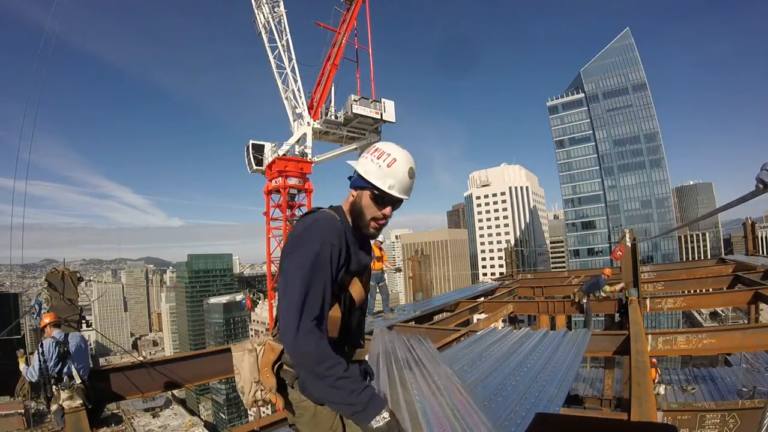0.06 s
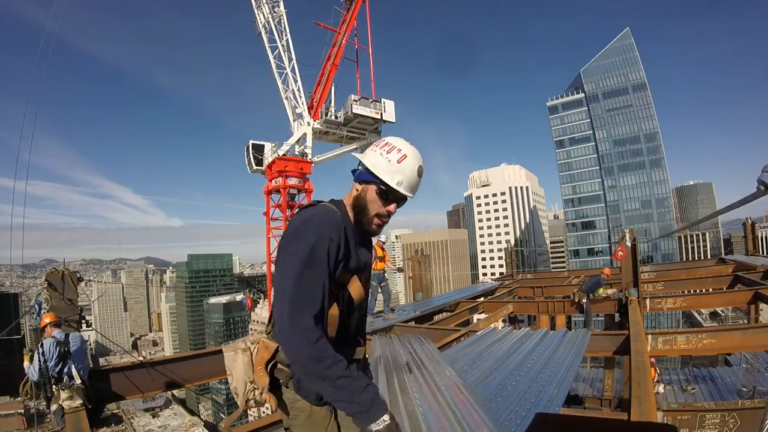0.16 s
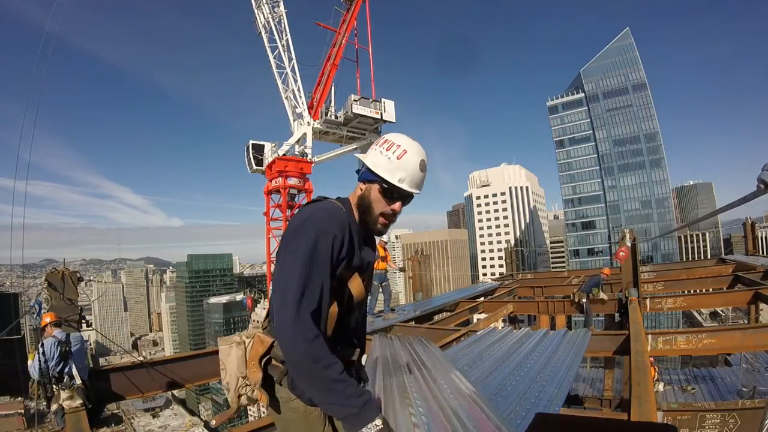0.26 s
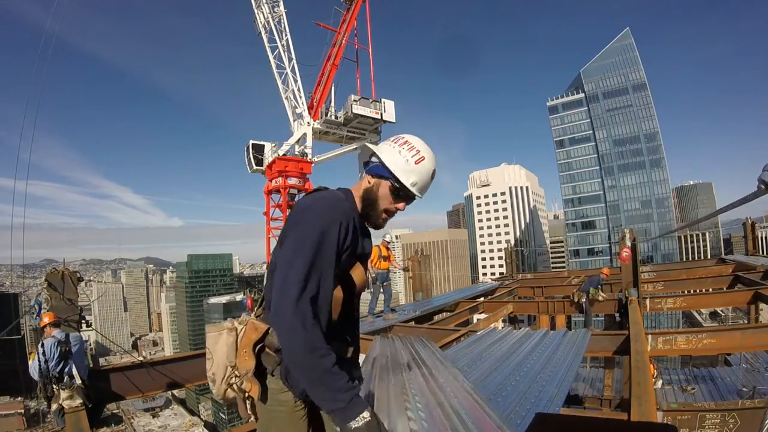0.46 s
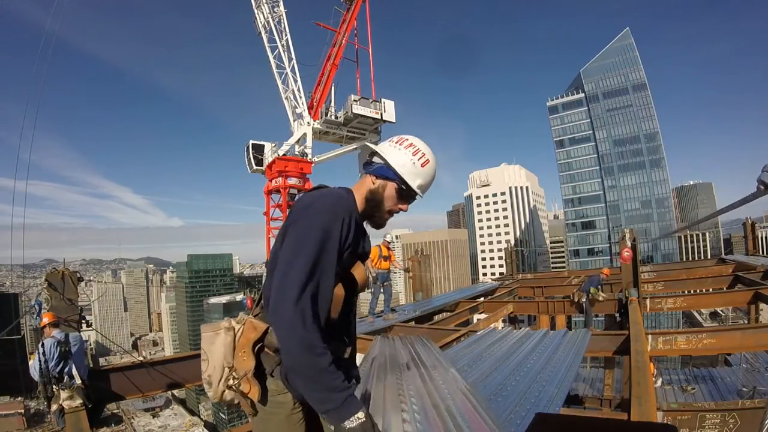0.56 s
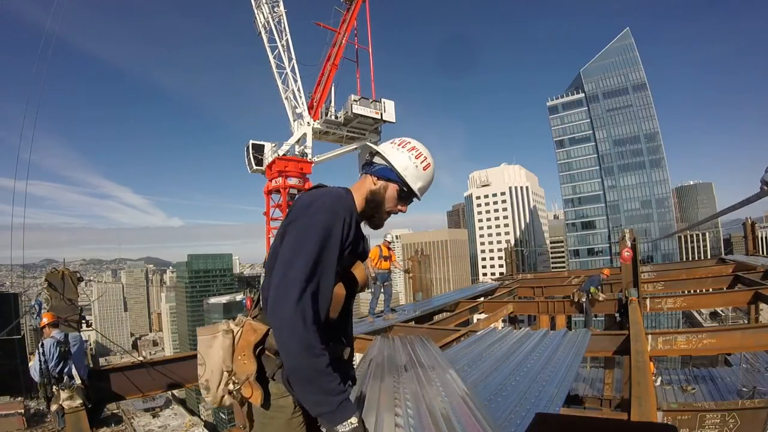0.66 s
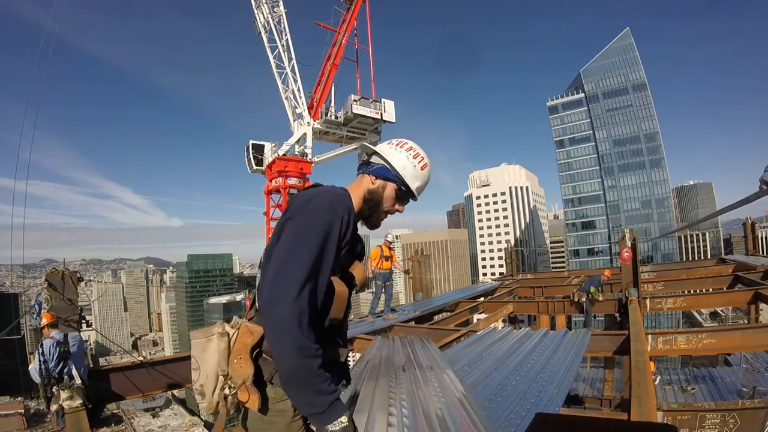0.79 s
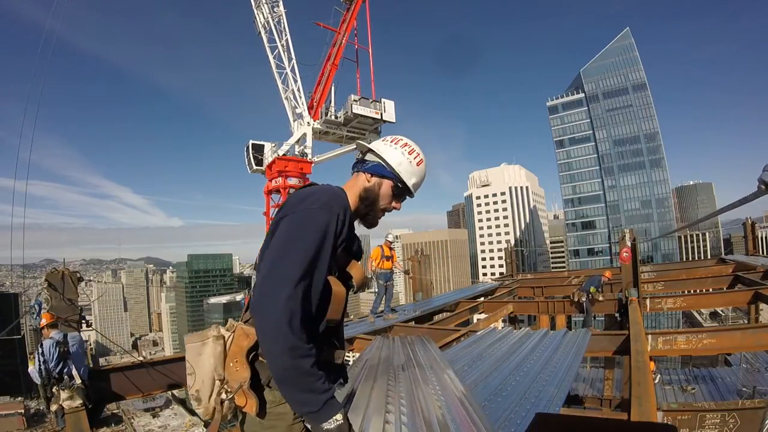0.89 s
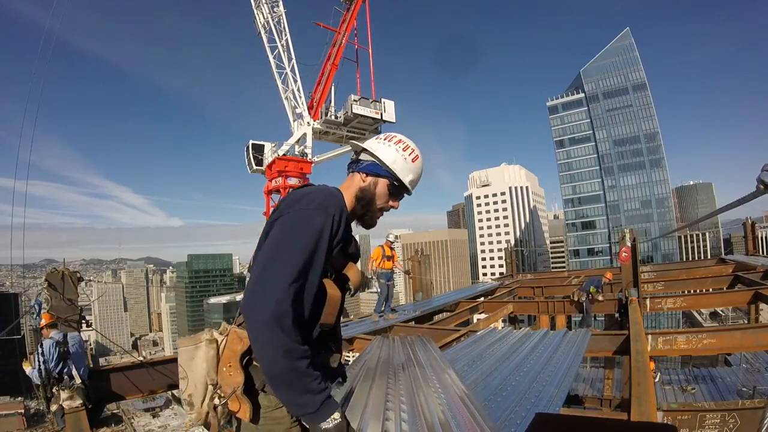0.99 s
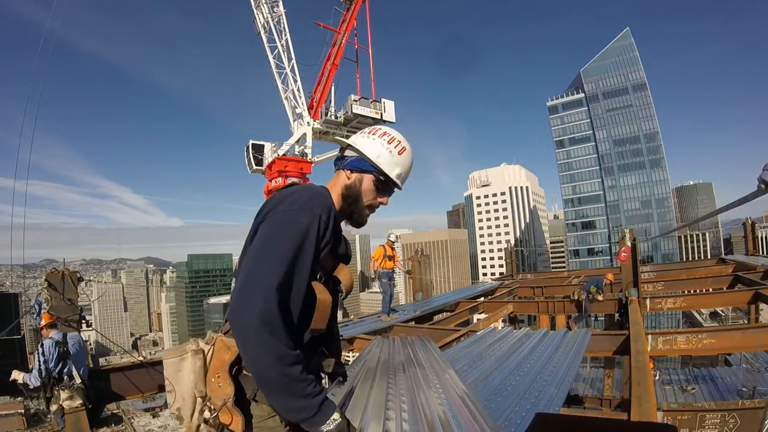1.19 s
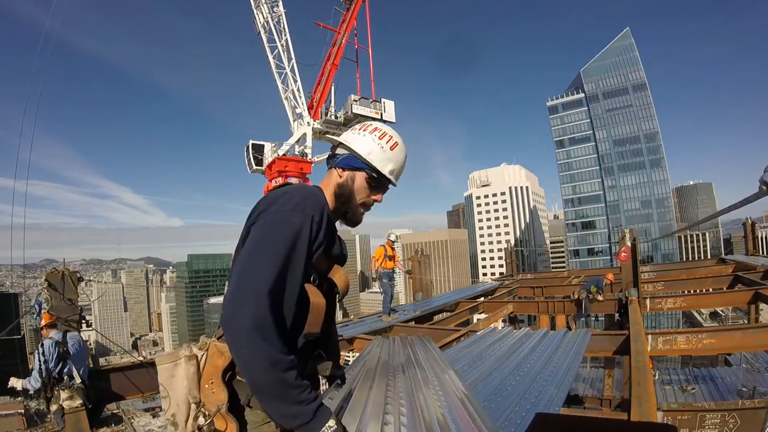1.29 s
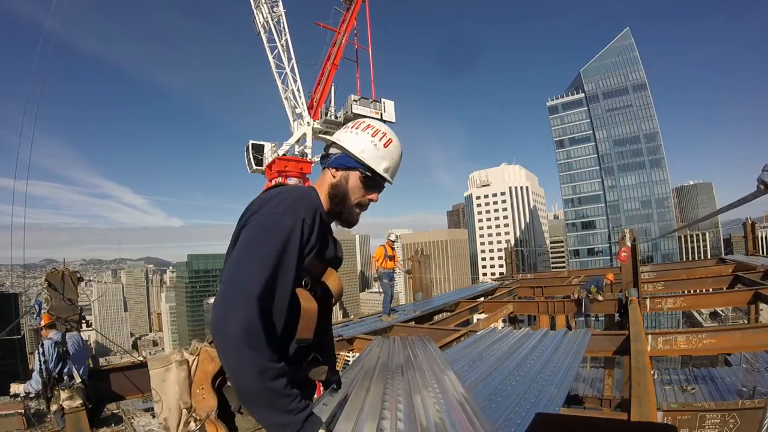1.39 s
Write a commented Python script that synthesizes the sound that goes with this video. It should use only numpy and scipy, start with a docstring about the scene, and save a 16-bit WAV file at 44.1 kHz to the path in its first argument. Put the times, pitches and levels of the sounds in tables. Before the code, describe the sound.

A corrugated steel sheet squeaks, bangs down on a stack, then scrapes and rattles to rest.

```python
"""Corrugated steel sheet landing on a stack.

Outdoors on a high steel frame, a long sheet squeaks by stick-slip as it starts to move, then bangs
down on a stack of decking. Impacts and sliding friction excite its dense modes, so it clashes several
times, then scrapes and rattles to rest. The whole sheet bends with a deep boom, its ribs drum and its
dragging edge groans; wind and the city rumble faintly below."""
import sys
import numpy as np
from scipy import signal
from scipy.fft import rfft, irfft, next_fast_len
from scipy.io import wavfile
from scipy.ndimage import uniform_filter1d, map_coordinates

SR = 44100
rng = np.random.default_rng(int(sys.argv[2]) if len(sys.argv) > 2 else 0)


def store_pcm(level_fs):
    """Save levels as 16-bit WAV."""
    pcm = np.round(np.clip(level_fs, -1, 1) * 32767).astype(np.int16)
    wavfile.write(sys.argv[1], SR, np.atleast_2d(pcm).T)


N = 63945
TIME = np.arange(N) / SR


# Spectra of the dense clang and the bright clash. Each row: frequency in Hz, relative density in dB.
CLANG_SPECTRUM = [(150, -36.5), (450, -23.5), (770, -24.5), (1080, -23), (1230, -15.5), (1380, -2),
                  (1580, 4), (1720, -5.5), (1840, -12.5), (2040, -4), (2330, -5.5), (2660, -8.5),
                  (2870, -18.5), (3150, -20), (3500, -25.5), (4100, -26.5), (5000, -38), (9000, -61.5),
                  (13000, -96.5)]
CLASH_SPECTRUM = [(1500, -30), (3000, -1.5), (4100, -0.5), (5200, -8), (6000, -1.5), (6600, 3),
                  (7500, -7.5), (8250, -4.5), (8800, -14.5), (10000, -25), (11500, -33.5), (13200, -48.5),
                  (15000, -71)]
# Blows on the stack. Each row: start in seconds, clang in dB, clash in dB, contact time in seconds.
IMPACTS = [(0.205, -16.5, -30.5, 0.011), (0.218, -21, -41.5, .016), (.23, -22, -45, 0.0082),
           (0.263, -25, -35.5, .025), (0.288, -17.5, -38, .018), (0.318, -19, -38, 0.019),
           (0.343, -20.5, -57, 0.012), (0.375, -24, -38.5, 0.0099), (0.389, -14.5, -36.5, 0.0042),
           (0.4, -18, -36, 0.013), (0.444, -21.5, -47, 0.0095), (0.468, -19.5, -36.5, 0.023),
           (.486, -22.5, -43, 0.0157), (0.496, -23, -47, 0.013), (0.532, -19.5, -43, 0.016),
           (0.619, -27, -52, 0.023), (0.646, -28.5, -49.5, 0.0076), (0.696, -27.5, -49.5, 0.0305),
           (0.762, -31, -58, 0.008), (0.809, -29.5, -52.5, 0.012), (0.908, -39, -59, 0.0055),
           (0.981, -40, -56.5, 0.005), (1.204, -40.5, -62.5, 0.0049), (1.261, -46.5, -75, .012)]

def blows():
    """Impact excitation: rib after rib lands in a short burst, giving a clang with a bright clash on top."""
    out = np.zeros(N)
    for start, clang_db, clash_db, length in IMPACTS:
        ring = ringing(grains() * swell(start - .002, length))
        clang = amp(clang_db) * peak_unit(coloured(ring, CLANG_SPECTRUM))
        clash = amp(clash_db) * peak_unit(coloured(ring, CLASH_SPECTRUM))
        out += clang + clash
    return out


# Ringing under the skid's pressure, and its scraping hiss. Each row: time in seconds, level in dB.
SKID_LEVEL = [(0, -52), (.11, -47), (.15, -38), (.2, -29.5), (.26, -18.5), (.36, -26.5), (.43, -24),
              (.56, -21), (.68, -26), (.85, -32), (1.0, -37.5), (1.12, -42), (1.26, -42.5), (1.35, -49),
              (1.45, -50.5)]
HISS_LEVEL = [(0, -67.5), (.13, -67.5), (.172, -51), (.198, -58), (.25, -43.5), (.36, -46.5), (.43, -47.5),
              (.54, -44), (.6, -51.5), (.76, -54), (.95, -70), (1.15, -66), (1.45, -86.5)]

def skid():
    """Frictional excitation: juddering contact keeps the sheet ringing and adds a gritty hiss."""
    skid_db, = curves(SKID_LEVEL)
    hiss_db, = curves(HISS_LEVEL)
    judder = amp(0.35 * wobble(89.1))
    body = steady(coloured(ringing(grains()), CLANG_SPECTRUM), size=1500)
    hiss = unit(coloured(grains(), CLASH_SPECTRUM))
    return judder * (amp(skid_db) * body + amp(hiss_db) * hiss)


def grains(per_second=4000):
    """Shot noise: tiny steel-on-steel contacts arrive at random, with random sign and size."""
    hit = rng.random(N) < per_second / SR
    sign = rng.choice([-1, 1], N)
    size_db = 7 * rng.uniform(-1.37, 1, N)
    return unit(hit * sign * amp(size_db))


# Damping of the sheet. Each row: frequency in Hz, time to decay by 60 dB in seconds.
DECAY_TIMES = [(200, 0.46), (1500, 0.22), (2500, 0.2), (4000, 0.17), (7000, 0.16), (12000, 0.076)]

def ringing(force):
    """Modal damping: countless modes decay, the high ones first; each contact point rings differently."""
    hz, t, spectra = signal.stft(rng.standard_normal(SR // 2), SR, nperseg=256)
    decay = amp(-60 * t / along(DECAY_TIMES, hz)[:, None])
    _, impulse_response = signal.istft(spectra * decay, SR, nperseg=256)
    return signal.fftconvolve(force, impulse_response)[:N]


# Lasting modes. Each row: frequency in Hz, relative level in dB, time to decay by 60 dB in seconds.
LONG_MODES = [(799, -18, 1.5), (918.7, -8.5, 1), (1280, -6.5, 1), (1388, 1, 1.3), (1512, -9.5, .5),
              (1566, -0.5, 1), (1780, -20.5, .6), (1754, -2, 0.69), (2025.4, -1.5, 0.38), (2215, -16.5, .7),
              (2312, -5.5, 1.3), (2370, -14.5, .9), (2350, -26, 0.47), (2735, -12.5, 0.38), (3110, -11, .8)]

def long_modes(clatter, gain_db=-13.5):
    """Resonance: a few lightly damped modes store the clatter's energy and sing on."""
    power = np.abs(uniform_filter1d(clatter ** 2, size=400))
    out = np.zeros(N)
    for hz, db, t60 in LONG_MODES:
        decay = amp(-120 * TIME / t60)  # energy goes as amplitude squared
        energy = np.abs(signal.fftconvolve(power, decay / decay.sum())[:N])
        envelope = amp(db + 1.9 * wobble(12.9)) * np.sqrt(energy)
        out += envelope * np.sin(2 * np.pi * hz * TIME + 1.42 * wobble(21.78))
    return amp(gain_db) * out


# Slow rise and fall of the hollow wash. Each row: time in seconds, level in dB.
WASH_LEVEL = [(0, -59.5), (.05, -64), (.1, -54.5), (.2, -43.5), (.29, -31), (.42, -31.5), (.62, -32.5),
              (.78, -34.5), (.9, -37.5), (1.02, -40.5), (1.1, -45), (1.2, -45), (1.3, -51), (1.45, -55.5)]
# Its spectrum. Each row: frequency in Hz, relative density in dB.
WASH_SPECTRUM = [(200, -18.5), (380, 2), (480, 1), (590, -6.5), (690, -1.5), (790, -0.5), (850, -3.5),
                 (920, 0.5), (1080, -9.5), (1250, 0.5), (1600, -14), (3000, -69), (6000, -96.5)]

def wash():
    """Modal overlap: the sheet's crowded lower modes merge into a hollow roar under the clatter."""
    db, = curves(WASH_LEVEL)
    return amp(db) * steady(coloured(grains(), WASH_SPECTRUM), size=2000)


# Flexing of the whole sheet. Each row: time in seconds, frequency in Hz, level in dB.
BENDING_MODE = [(0, 61.5, -35), (.06, 63.94, -48.5), (.15, 66.2, -31), (.215, 62.3, -43), (.27, 62, -24.5),
                (.304, 63.1, -18), (.345, 62.5, -28), (.388, 60.5, -40.5), (.408, 65.8, -11.5),
                (.5, 68.7, -12), (.58, 65.34, -18), (.626, 63.2, -30), (.655, 65, -18), (.76, 69.1, -21.5),
                (.79, 73, -29.5), (.905, 73, -28), (.98, 69.5, -38), (1.08, 65.26, -26.5), (1.3, 65.5, -31),
                (1.36, 66.3, -40), (1.43, 65.2, -26.5)]
# Rumble of the neighbouring modes. Each row: frequency in Hz, relative density in dB.
RUMBLE_SPECTRUM = [(20, -15.5), (40, -11.5), (58, -1), (84, -3), (102, -11), (200, -23.5), (600, -75),
                   (4000, -125)]

def boom(rumble_offset_db=-9):
    """Flexural vibration: the lowest bending mode booms, and a rumble loosely follows its level."""
    hz, db = curves(BENDING_MODE)
    shudder_db = 0.8 * wobble(25)
    tone = np.sqrt(2) * amp(db + shudder_db) * np.sin(phase(hz))
    rumble = steady(noise(RUMBLE_SPECTRUM), size=5000)
    trend_db = db.mean() + 0.87 * (uniform_filter1d(db, size=7000) - db.mean())
    return tone + amp(trend_db + rumble_offset_db) * rumble


# Modes of the ribs and of the flats between them. Each row: frequency in Hz, relative level in dB.
RIB_MODES = [(128, 1), (153, 1.5), (174, -0.5)]
FLAT_MODES = [(203, -4.5), (242, 0.5), (263, -3), (283, -9), (305, -4.5), (338, -2.5), (378, -10)]
# Drumming of the sheet. Each row: time in seconds, level of the ribs in dB, level of the flats in dB.
DRUM_LEVELS = [(0, -58, -36.5), (.04, -51, -58), (.07, -33, -38.5), (.12, -44, -37), (.17, -47, -32.5),
               (.22, -45, -30.5), (.3, -35, -28), (.45, -22.5, -28.5), (.7, -37, -35), (.95, -28.5, -35.5),
               (1.1, -36.5, -35), (1.25, -31.5, -37.5), (1.45, -41.5, -43.5)]

def drumming():
    """Forced vibration: ribs and flats drum as they ride over the stack."""
    ribs_db, flats_db = curves(DRUM_LEVELS)
    ribs = amp(ribs_db) * rubbed(RIB_MODES, rate=20, smear=1.0)
    flats = amp(flats_db) * rubbed(FLAT_MODES, rate=30, smear=0.99)
    return ribs + flats


def rubbed(modes, rate, smear):
    """Random modulation: under uneven rubbing each mode wanders in level and phase."""
    out = np.zeros(N)
    for hz, db in modes:
        envelope = amp(db + 5 * wobble(rate))
        angle = 2 * np.pi * (hz * TIME + rng.random())
        out += envelope * np.sin(angle + smear * wobble(rate))
    return unit(out)


# Popping ribs. Each row: start in seconds, frequency in Hz, level in dB, length in seconds.
RIB_POPS = [(.238, 152.7, -21.5, 0.046), (.275, 154.5, -17.5, .05), (.33, 154.4, -23.5, 0.045),
            (.365, 153.4, -21.5, 0.033), (.41, 157, -25, 0.044), (.59, 158, -21, .04),
            (.645, 169.4, -23, .06), (.76, 154, -18, 0.028), (.812, 143, -21, 0.02)]

def rib_pops():
    """Snap-through: a rib pops and gives a few cycles of a low tone."""
    out = np.zeros(N)
    for start, hz, db, length in RIB_POPS:
        out += amp(db) * swell(start, length) * np.sin(2 * np.pi * hz * (TIME - start))
    return np.sqrt(2) * out


# Groan of the edge. Each row: time in seconds, frequency in Hz, level in dB.
EDGE_GROAN = [(0, 330, -72), (.09, 325, -45), (.15, 350, -35), (.22, 350, -35.5), (.3, 348, -41.5),
              (.37, 340, -32), (.5, 338, -34), (.66, 338, -33), (.73, 340, -41), (.82, 342, -35.5),
              (.93, 340, -47), (1.15, 335, -46.5), (1.25, 343, -37.5), (1.36, 343, -41.5),
              (1.45, 345, -48.5)]

def groan(waver=0.34):
    """Friction-driven oscillation: the dragging edge sustains one low mode of the flats."""
    hz, db = curves(EDGE_GROAN)
    envelope = np.sqrt(2) * amp(db + 0.82 * wobble(25))
    return envelope * np.sin(phase(hz) + waver * wobble(30))


# Squeaks. Each row: start and length in seconds, first and last frequency in Hz, level in dB.
EDGE_SQUEAKS = [(0.059, 0.017, 1452, 1480, -34.5), (0.072, 0.034, 1455, 1386, -36.5),
                (0.118, 0.036, 709, 682, -36), (.128, .018, 1490, 1460, -36.5),
                (0.139, 0.0144, 2260, 2160, -31.5), (0.15, 0.02, 1510, 1460, -30),
                (0.154, 0.016, 2140, 2350, -31.5), (.169, .018, 2260, 2170, -27.5),
                (.17, 0.011, 1540, 1415, -26), (.184, 0.011, 1500, 1499, -29),
                (0.186, 0.023, 679, 716, -39.5), (0.208, .032, 1578, 1687, -14.5)]

def squeaks(roughness=.35):
    """Stick-slip: the edge catches and releases, giving short gliding tones."""
    out = np.zeros(N)
    for start, length, first_hz, last_hz, db in EDGE_SQUEAKS:
        hz = np.interp(TIME, [start, start + length], [first_hz, last_hz])
        out += amp(db) * swell(start, length) * np.sin(phase(hz) + roughness * wobble(404.6))
    return np.sqrt(2) * out


# Outdoor background. Each row: frequency in Hz, relative density in dB.
AIR_SPECTRUM = [(20, -19), (45, -7), (70, 3.5), (110, -8), (300, -17.5), (500, -26), (1000, -31.5),
                (2500, -34), (4500, -49.5), (8000, -56), (12000, -63), (15000, -63)]

def air(level_db=-39):
    """Ambient noise: wind and the distant city make a low rumble that swells with the gusts."""
    gust_db = 3.5 * wobble(5.3)
    return amp(level_db + gust_db) * noise(AIR_SPECTRUM)


def amp(db):
    """Decibels to gain."""
    return 10 ** (np.asarray(db) / 20)


def unit(x):
    """Scale to rms 1."""
    return x / np.sqrt(np.mean(x ** 2) + 1e-20)


def peak_unit(x, size=700):
    """Scale the loudest window of size samples to rms 1."""
    return x / np.sqrt(uniform_filter1d(x ** 2, size).max() + 1e-20)


def steady(x, size):
    """Hold x at rms 1 over windows of size samples."""
    return x / np.sqrt(np.abs(uniform_filter1d(x ** 2, size)) + 1e-12)


def along(points, hz):
    """Interpolate (Hz, value) points on a log frequency axis."""
    freqs, values = np.transpose(points)
    return np.interp(np.log(hz + 1), np.log(freqs + 1), values)


def curves(rows):
    """Interpolate each column after the time to one value per sample."""
    times, *columns = np.transpose(rows)
    return [np.interp(TIME, times, column) for column in columns]


def swell(start, length):
    """A half-sine rise and fall."""
    return np.sin(np.pi * np.clip((TIME - start) / length, 0, 1))


def wobble(rate):
    """A smooth, bounded random curve, rate knots a second."""
    knots = 1.6 * np.tanh(rng.standard_normal(int(N * rate / SR) + 4) / 1.2)
    return map_coordinates(knots, [TIME * rate])


def phase(hz):
    """Phase in radians, the running integral of frequency."""
    return 2 * np.pi * np.cumsum(hz) / SR


def noise(spectrum):
    """Gaussian noise with the given spectrum, at rms 1."""
    return unit(filtered(rng.standard_normal(N), lambda hz: amp(along(spectrum, hz))))


def filtered(x, response):
    """Zero-phase filtering by a gain that depends on frequency."""
    size = next_fast_len(N + SR // 2)
    return irfft(rfft(x, size) * response(np.fft.rfftfreq(size, 1 / SR)), size)[:N]


def coloured(x, spectrum):
    """Minimum-phase filtering with the given spectrum."""
    size = 2 * next_fast_len(N)
    gain = amp(along(spectrum, np.fft.rfftfreq(size, 1 / SR)))
    cepstrum = irfft(np.log(gain))
    cepstrum[1:size // 2] *= 2  # folding onto positive time makes the filter causal
    cepstrum[size // 2 + 1:] = 0
    return irfft(rfft(x, size) * np.exp(rfft(cepstrum)))[:N]


def scene():
    """Superposition: the sounds of the nearby sheet add in open air, in one channel."""
    clatter = blows() + skid()
    sheet = clatter + long_modes(clatter) + wash() + boom() + drumming() + rib_pops()
    return (sheet + groan() + squeaks() + air())[None]


def record(dry, cutoff_hz=15200):
    """Band limiting: nothing above the cutoff passes."""
    return filtered(dry[0], lambda hz: hz < cutoff_hz)[None]


dry = scene()
out = record(dry)
store_pcm(out)
```